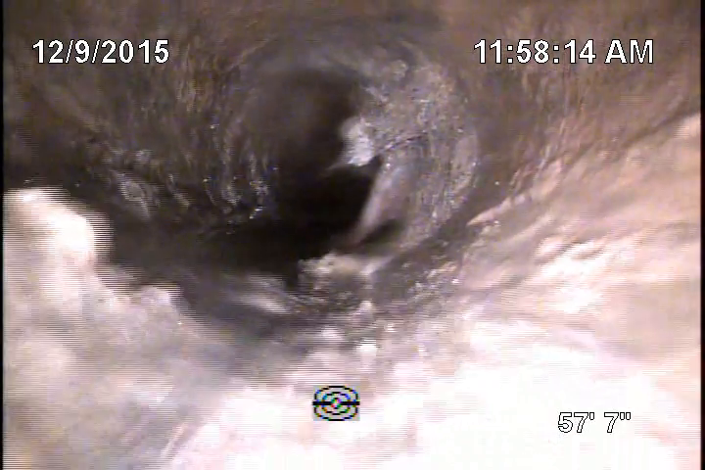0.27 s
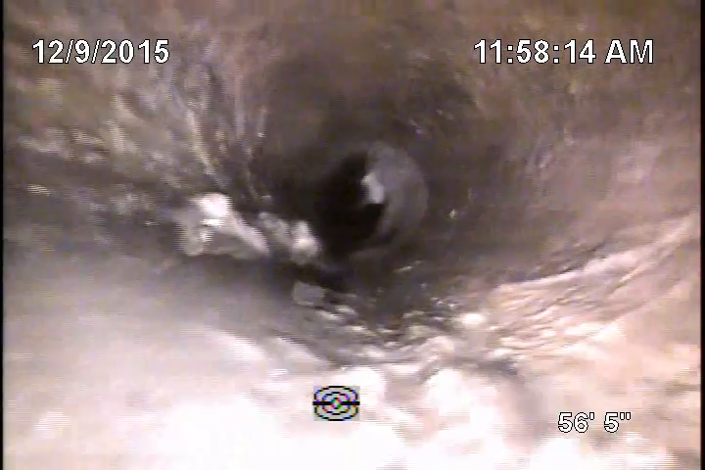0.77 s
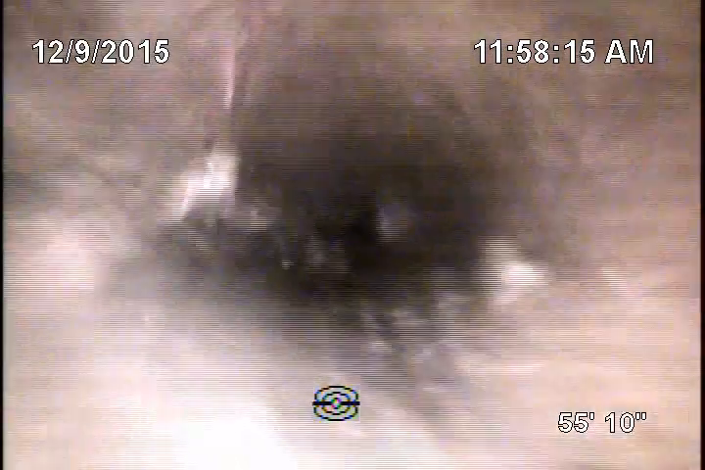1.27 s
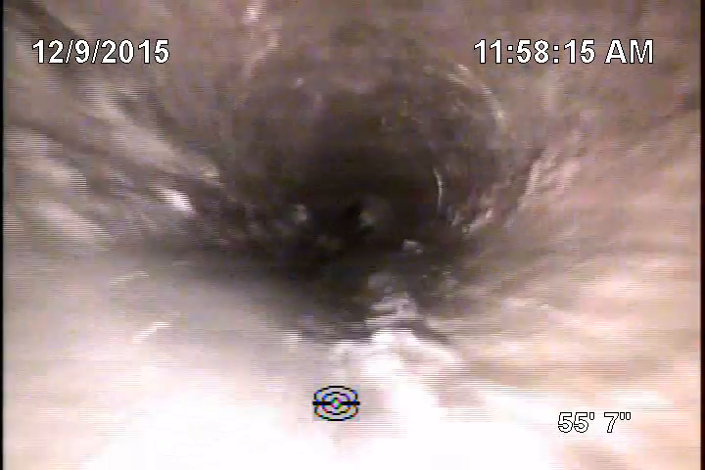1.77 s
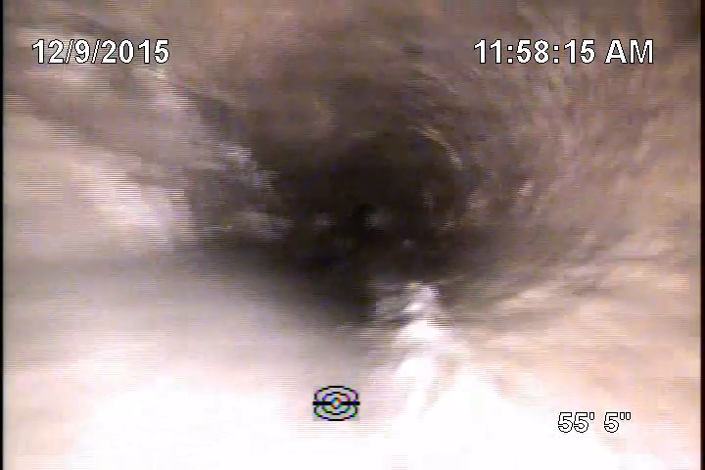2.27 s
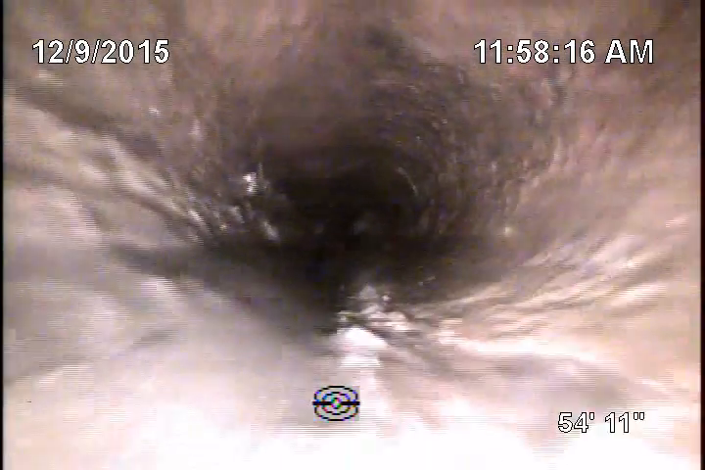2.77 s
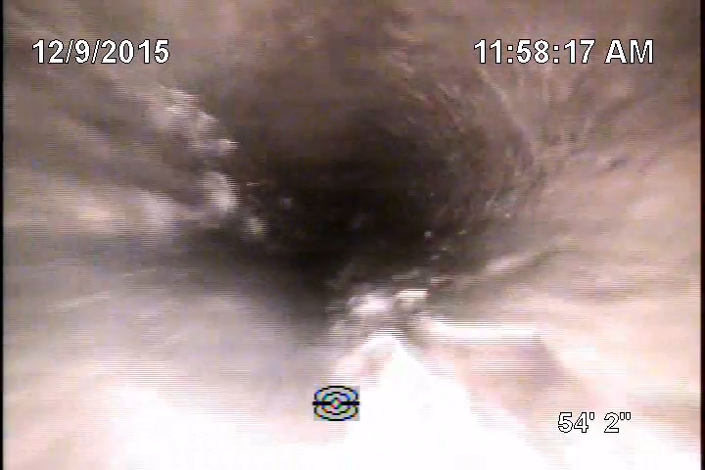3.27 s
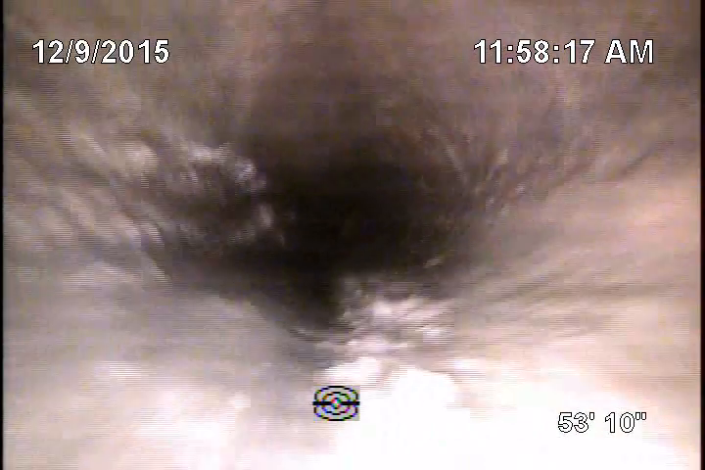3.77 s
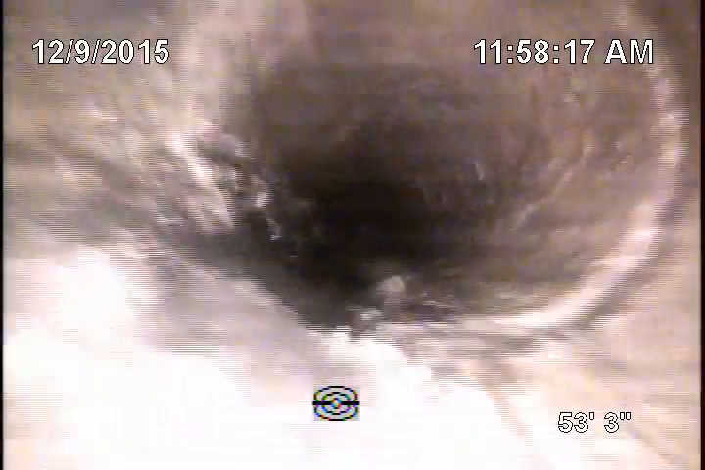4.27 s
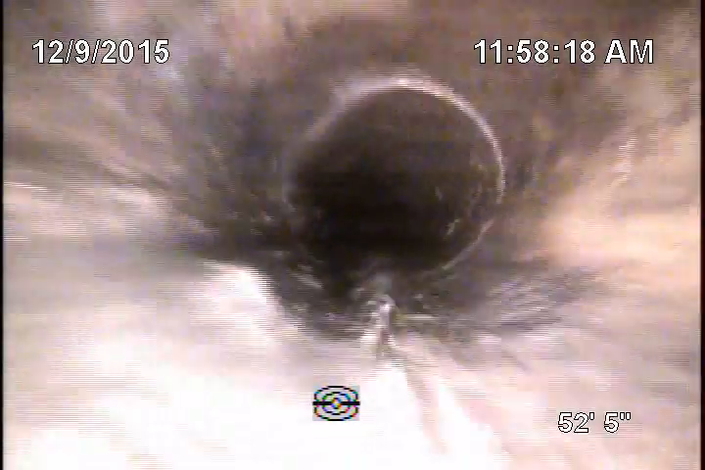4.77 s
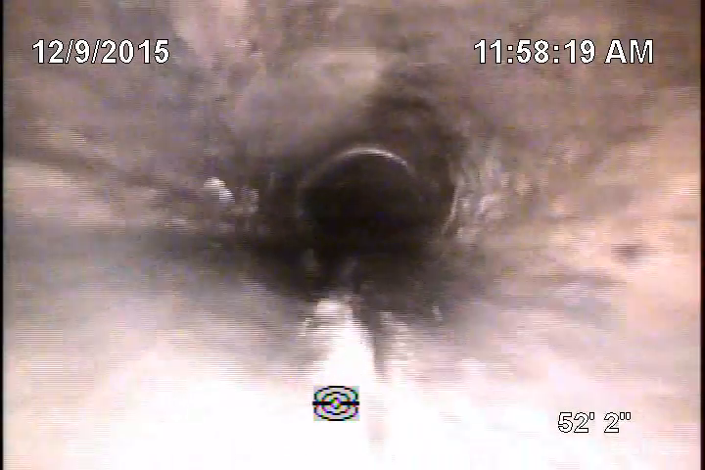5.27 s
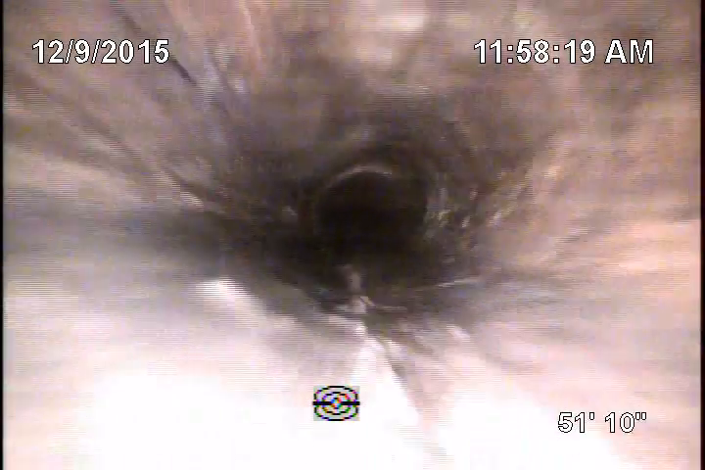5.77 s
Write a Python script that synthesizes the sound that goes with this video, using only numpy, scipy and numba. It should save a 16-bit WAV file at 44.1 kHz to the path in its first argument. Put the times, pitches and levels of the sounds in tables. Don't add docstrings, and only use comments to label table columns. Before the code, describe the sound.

A stiff push cable is pulled back by hand into its reel outdoors, very close to a small built-in microphone. It opens with a tight cluster of hard clacks, then sparse ticks, scrapes and separate rattling strokes. A sharp double knock with a brief high steel ping comes past the middle, and the heaviest, distorted slam lands near five seconds before light clicks and brushes. Faint hiss and a thin whine stay underneath.

```python
import sys
import numpy as np
from scipy import signal
from scipy.fft import rfft, irfft
from scipy.io import wavfile
from numba import njit

SR = 44100
rng = np.random.default_rng(int(sys.argv[2]) if len(sys.argv) > 2 else 0)


def file_out(sig):
    cols = np.atleast_2d(sig).T
    lim = np.clip(cols, -1, 1)
    pcm = np.round(lim * 32767).astype(np.int16)
    wavfile.write(sys.argv[1], SR, pcm)


def ratio_of_db(decibels):
    return 10 ** (np.asarray(decibels, float) / 20)


N = 264600

# f/Hz, width/Hz, level/dB
HOUSING_MODES = [(221.4, 24.8, -3), (453, 49, -3.5), (287, 110, -11.5)]


def rms_one(x):
    return x / np.sqrt(np.mean(x ** 2) + 1e-20)


def drift(rate_hz):
    r = np.exp(-2 * np.pi * rate_hz / SR)
    return rms_one(signal.lfilter([1], [1, -2 * r, r * r], rng.standard_normal(N + SR))[SR:])


def resonate(x, hz, width_hz):
    r = np.exp(-np.pi * width_hz / SR)
    zeros = np.array([1, 0, -1]) * (1 - r * r) / 2
    return signal.lfilter(zeros, [1, -2 * r * np.cos(2 * np.pi * hz / SR), r * r], x)


def cut(x, hz, kind):
    return signal.sosfilt(signal.butter(2, min(hz, .45 * SR), kind, fs=SR, output="sos"), x)


def ring_housing(x):
    return sum(ratio_of_db(db) * resonate(x, hz, width_hz) for hz, width_hz, db in HOUSING_MODES)


def grains(per_s, spread_db):
    sizes = ratio_of_db(spread_db * np.minimum(rng.exponential(1, N), 4)) * rng.choice([-1, 1], N)
    hit = rng.random(N) < per_s * ratio_of_db(1.5 * drift(40)) / SR
    return sizes * hit + 1e-18


def rattle(modes, per_s, spread_db, patchy_db):
    out = 0
    for hz, width_hz, level_db in modes:
        ring = rms_one(resonate(grains(per_s, spread_db), hz, width_hz))
        out = out + ratio_of_db(level_db + patchy_db * drift(19)) * ring
    return rms_one(out)


@njit
def sweep(x, cosines, r):
    out = np.zeros(len(x))
    for i in range(2, len(x)):
        out[i] = x[i] - x[i - 2] + 2 * r * cosines[i] * out[i - 1] - r * r * out[i - 2]
    return out


def contact(centre_hz, width_hz, per_s):
    cosines = np.cos(2 * np.pi * centre_hz / SR)
    return rms_one(sweep(grains(per_s, 1.4), cosines, np.exp(-np.pi * width_hz / SR)))


def floor():
    # f/Hz, level/dB
    spectrum = [(26, -44), (45, -11), (126, -5), (220, 4.5), (377, -9), (448, -5), (3090, -2), (7270, -5),
                (7820, -8.5), (15500, -7.5)]
    floor_db, whine_db, whine_hz = -49.5, -59, 8000
    hz, level_db = np.transpose(spectrum)
    bins_hz = np.maximum(np.fft.rfftfreq(N, 1 / SR), 1)
    gain = ratio_of_db(np.interp(np.log(bins_hz), np.log(hz), level_db))
    noise = irfft(rfft(rng.standard_normal(N)) * gain, N)
    whine = np.sqrt(2) * ratio_of_db(whine_db) * np.sin(2 * np.pi * whine_hz * np.arange(N) / SR)
    return ratio_of_db(floor_db) * rms_one(noise) + whine


def yard(x):
    t = np.arange(SR // 4) / SR
    decay = ratio_of_db(-60 * t / 0.14) * np.minimum(t / 0.0016, 1)
    tail = cut(rng.standard_normal(len(t)) * decay, 1900, "low")
    return ratio_of_db(-17.5) * signal.fftconvolve(x, tail / np.sqrt(np.sum(tail ** 2)))[:N]


def bumps():
    # t/s, peak/dB
    push_events = [
        (1.345, -38),
        (3.049, -22),
        (5.636, -35.5),
        (5.841, -37),
    ]
    pushes = np.full(N, 1e-18)
    for s, peak_db in push_events:
        pushes[round(s * SR)] = ratio_of_db(peak_db + 44)
    return ring_housing(cut(pushes, 290, "low"))


def steel():
    # f/Hz, level/dB, t60/s
    steel_modes = [(7257, -13.5, .16), (7229, -22, .23)]
    hit_s, damped_s = 3.7105, 4.7
    t = np.maximum(np.arange(N) / SR - hit_s, 0)
    damped_db = -1500 * np.maximum(t - (damped_s - hit_s), 0)
    return sum(ratio_of_db(db - 60 * t / t60 + damped_db) * np.sin(2 * np.pi * hz * t) for hz, db, t60 in steel_modes)


def rubs():
    # start t/s, length/s, level/dB, from f/Hz, to f/Hz
    rub_events = [
        (1.24, .1, -50, 2300, 2100),
        (2.52, .05, -27, 1500, 1900),
        (2.642, .035, -38, 3800, 3500),
        (2.708, .075, -35, 4400, 4000),
        (2.842, .03, -40, 4200, 3400),
        (4.11, .04, -46, 2700, 2500),
        (5.14, .06, -33, 4500, 4100),
    ]
    edge_s, fade_db = .008, 5
    t = np.arange(N) / SR
    gain, hz = np.zeros(N), np.full(N, 3000.)
    for s, length_s, level_db, from_hz, to_hz in rub_events:
        along = (t - s) / length_s
        gate = np.clip(np.minimum(t - s, s + length_s - t) / edge_s + .5, 0, 1)
        gain += gate * ratio_of_db(level_db - fade_db * np.clip(along, 0, 1))
        hz = np.where(gate > 0, from_hz + (to_hz - from_hz) * along, hz)
    return gain * rms_one(cut(contact(hz, 380, per_s=5000), 900, "high"))


def contacts():
    # t/s, peak/dB, main ring f/Hz, relative thump/dB
    slaps = [(.016, 3, 1940, -26.5), (.043, -13, 1960, -40), (.052, 7.5, 1820, -37.5),
             (.087, -9.5, 710, -26), (0.127, -6, 1910, -42), (0.778, -6, 1160, -26), (.794, 7, 1820, -23),
             (0.872, -7.5, 1380, -42), (1.38, -18, 1510, -16), (1.876, -17, 1600, -21),
             (1.912, -6.5, 1760, -33), (1.9395, -6, 1700, -17), (2.546, -7, 1700, -30),
             (2.589, -4.5, 1820, -15.5), (2.798, -17.5, 2020, -4.5), (2.951, -4, 2350, -33),
             (3.069, -13.5, 1500, -38), (3.094, 3, 2100, -44), (3.116, -9, 860, -19),
             (3.342, -14, 770, -1.5), (3.686, -11, 2150, -33), (3.701, 7.5, 2360, -19),
             (3.71, 4, 1580, -13), (3.895, -11.5, 1060, -15), (4.529, 7, 1900, -10),
             (4.927, 14.5, 1910, -9), (4.935, 20.5, 2160, -25), (4.949, 2.5, 1830, -1),
             (4.972, 6, 2050, -28), (5.139, -6.5, 1900, -35)]
    # t/s, peak/dB, main ring f/Hz, relative snap/dB
    ticks = [(.121, -13, 770, -20), (.361, -27, 2800, -8.5), (.441, -22, 1290, -24),
             (.619, -20, 3180, -13.5), (.758, -18, 865, -26), (2.052, -9, 1150, -48),
             (2.063, -5, 1100, -34), (2.109, -16, 1000, -17.5), (2.203, -19.5, 810, -18.5),
             (2.367, -27.5, 2630, -17), (2.714, -19, 4120, -17), (2.741, -10.5, 3740, -14),
             (2.772, -13.5, 4430, -13), (2.939, -10, 1770, -23), (2.969, -15, 760, -7),
             (3.184, -29.5, 960, -5), (3.322, -23, 970, -9), (4.371, -23, 2240, -32),
             (4.382, -16.5, 2070, -21), (4.472, -34, 1760, -17), (4.546, -17, 1270, -27),
             (4.628, -15.5, 3000, -25), (4.862, -17, 2100, -18), (5.142, -8, 3700, -26),
             (5.213, -19, 2150, -12.5), (5.386, -30, 1710, -2.5), (5.464, -19, 4180, -14),
             (5.653, -24.5, 3430, -11), (5.703, -21.5, 4400, -6), (5.832, -30, 3340, -14)]
    # t/s, peak/dB, main ring
    # f/Hz
    flicks = [(.487, -34.5, 1500), (1.625, -37, 1290), (3.012, -25, 2510), (4.055, -27, 1750),
              (4.106, -26, 2700), (4.833, -30, 2350), (4.531, -2.5, 800), (3.096, -6.5, 625),
              (5.747, -35, 3000), (5.902, -39, 2800), (5.929, -34.5, 1900), (5.968, -36, 2400),
              (5.988, -31, 3800)]
    slap_snap_db, flick_snap_db = -26.5, -12
    tick_thump_db, thump_db_per_octave = -18, -1
    knock_list = [(s, db, hz, slap_snap_db, thump_db) for s, db, hz, thump_db in slaps]
    for s, db, hz, snap_db in list(ticks) + [(*row, flick_snap_db) for row in flicks]:
        thump_db = tick_thump_db + thump_db_per_octave * np.log2(hz / 1000)
        knock_list.append((s, db, hz, snap_db, thump_db))
    return knock_list


def knocks():
    out, length = np.zeros(N + SR), SR // 4
    t = np.arange(length) / SR
    t60_s, rise_s = 0.019, 0.00055
    shape = ratio_of_db(-60 * (t / t60_s) ** 0.99) * np.minimum(t / rise_s, 1)
    for s, peak_db, hz, snap_db, thump_db in contacts():
        noise = rng.uniform(-1.19, 1, SR // 20)
        burst = np.pad(noise, (0, length - len(noise))) * shape + 1e-18
        rings = resonate(burst, hz, 0.34 * hz) - ratio_of_db(-4) * resonate(burst, 1.64 * hz, 0.14 * hz)
        crack = cut(cut(burst, 680, "high"), min(3900, 2.3 * hz), "low")
        body = cut(rings, 2.08 * hz, "low") + ratio_of_db(-12) * crack
        snap = cut(burst * ratio_of_db(-300 * t), 3100, "high")
        thump = cut(ring_housing(burst), 155.7, "high")
        parts = [(body, -1.5), (snap, snap_db + 11.5), (thump, thump_db - 5.5)]
        at = round(s * SR)
        out[at:at + length] += sum(ratio_of_db(peak_db + db) * part / np.abs(part).max() for part, db in parts)
    return out[:N]


def strokes():
    # peak t/s, build-up/s, level/dB, relative grit/dB, relative weight/dB
    jerks = [(0.053, 0.2, -11, -25, -11), (0.133, 0.11, -24.5, -15, -6.5), (0.448, 0.12, -37.5, -1, -6.5),
             (0.793, 0.085, -18, -6.5, -16.5), (0.886, 0.08, -33.5, -8, -0.5),
             (1.526, 0.094, -33.5, -23, -6), (1.915, 0.071, -22, -7, -5.5), (2.054, 0.011, -29, -30, -9),
             (2.064, 0.015, -28, -26, -14), (2.215, 0.05, -48, -3, 5), (2.804, .015, -27.5, -10, -13.5),
             (2.949, 0.059, -21.5, -3.5, -10.5), (3.092, 0.0098, -21.5, -3, -6.5),
             (3.342, 0.025, -41.5, -5, 5), (3.672, 0.09, -29.5, -12, -9), (3.711, 0.061, -12.5, 1, -12.5),
             (3.76, 0.15, -39, -5, -16), (3.894, 0.0074, -33, 1, -16), (4.302, 0.21, -46.5, -2.5, -1),
             (4.533, .015, -16.5, -2, -19), (4.935, 0.05, -7, -5.5, -10.5), (4.975, 0.11, -10.5, -7, -15.5),
             (5.143, .01, -30, -6.5, -8.5), (5.843, .04, -55.5, 10, 1.5)]
    # offset/dB, quick fall/(dB/s), tail/dB, tail fall/(dB/s)
    after_jerk = [(-2, 307, -4.5, 99), (-1.5, 459.5, -4, 114.5), (-2, 705, -9.5, 128.5),
                  (-3, 905, -14, 135)]
    # start t/s, length/s, hiss/dB, relative grit/dB, relative rasp/dB
    slides = [(0.0, 0.056, -38.5, -2.5, 17), (0.113, 0.08, -39.5, -6.5, -16),
              (0.622, 0.021, -37.5, -2.5, -5.5), (.748, .03, -47.5, 10, 10), (1.056, 0.16, -47.5, -1, -1),
              (1.228, .1, -65.5, 4.5, 19), (1.377, 0.14, -39, 3, 8.5), (1.813, 0.18, -51.5, -0.5, 0.5),
              (2.407, 0.14, -52.5, 0.5, 7), (2.533, 0.048, -41, 4.5, 12), (2.588, 0.034, -28.5, 7, 7.5),
              (2.647, 0.028, -34, -3, -9), (2.715, .06, -32, -6, -14), (3.326, 0.02, -38, -6, -7.5),
              (4.001, 0.061, -40.5, -5, -4), (4.113, 0.036, -39.5, -6.5, -7), (4.42, .07, -50, 3, 5),
              (4.608, 0.068, -41, 2, 6), (4.726, 0.06, -44, -2, -2.5), (5.376, .05, -44.5, -1, -2.5),
              (5.461, 0.072, -38, -8, -10), (5.932, .045, -46, -5, -4), (5.984, .05, -36.5, -15, -17)]
    # start t/s, length/s, hiss/dB, relative grit/dB, relative rasp/dB
    brushes = [(0.217, 0.063, -49, -3, -8), (.655, .035, -57, 5, -2), (0.916, 0.094, -50, -1, 7),
               (1.576, 0.062, -49.5, 3.5, -2.5), (2.838, 0.039, -52, 12.5, 13), (2.99, 0.015, -45, 2, -6),
               (3.63, .04, -45, -4, -1.5), (4.485, .035, -42, 2, 1), (5.03, 0.057, -40.5, 6, 11),
               (5.143, 0.025, -49.5, 18, 3), (5.193, 0.048, -57.5, 17, 8), (5.268, 0.089, -53.5, -1, 10),
               (5.68, 0.1, -56.5, 2, -15), (5.897, .01, -56, 4, 1)]
    # stop t/s, swell/s, hiss/dB, relative grit/dB, relative rasp/dB
    catches = [
        (0.816, 0.12, -44, 3.5, 10.5),
        (2.117, .12, -48, -8, 14),
        (2.561, 0.099, -45.5, 4, 10),
        (3.82, 0.4, -51.5, 5, 15.5),
        (4.394, 0.061, -41.5, 9, 15.5),
        (5.992, 0.042, -35, -4, -10),
    ]
    build_up_db, tail_follows_weight = 36, 0.54
    rise_db_per_s, fall_db_per_s, slide_boom_db = 706, 605, -12
    stop_db_per_s, catch_boom_db = 2500, -8

    t = np.arange(0, N + 32, 32) / SR
    driven, ringing = np.full((4, len(t)), 1e-5), np.zeros((4, len(t)))
    for s, build_s, level_db, grit_db, weight_db in jerks:
        part_db = [weight_db, 0, grit_db, grit_db]
        for k, (offset_db, quick, tail_db, slow) in enumerate(after_jerk):
            top_db = level_db + offset_db + part_db[k]
            driven[k] += ratio_of_db(top_db - np.where(t < s, build_up_db * (s - t) / build_s, quick * (t - s)))
            tail_top_db = top_db + tail_db + (k > 0) * tail_follows_weight * weight_db
            ringing[k] += ratio_of_db(tail_top_db - slow * np.abs(t - s)) * (t > s)
    for s, length_s, hiss_db, grit_db, rasp_db in list(slides) + list(brushes):
        rise_db = rise_db_per_s * np.maximum(s - t, 0)
        fall_db = fall_db_per_s * np.maximum(t - s - length_s, 0)
        part_db = np.array([[rasp_db + slide_boom_db], [rasp_db], [grit_db], [0]])
        driven += ratio_of_db(hiss_db - (rise_db + fall_db) + part_db)
    for s, swell_s, hiss_db, grit_db, rasp_db in catches:
        edge_db = np.where(t < s, build_up_db * (s - t) / swell_s, stop_db_per_s * (t - s))
        part_db = np.array([[rasp_db + catch_boom_db], [rasp_db], [grit_db], [0]])
        driven += ratio_of_db(hiss_db - edge_db + part_db)
    taut = driven[1] / (driven[1] + ringing[1])
    return [np.interp(np.arange(N) / SR, t, row) for row in [*(driven + ringing), taut]]


def drag():
    # f/Hz, width/Hz, level/dB
    cage_modes = [(791, 197, 2), (1220, 330, -5), (1640, 790, -11), (2070, 240, -3), (2350, 63, -7.5)]
    # f/Hz, width/Hz, level/dB
    grit_modes = [(3020, 440, 5.5), (3900, 2100, -4), (4950, 490, -5)]
    taut_hz, slack_hz = 1900, 1000
    grit_loud_hz, grit_soft_hz, grit_turn_db = 2960, 4200, 1.2
    taut_cage_db, bright_grit_db = -4.5, 2.5

    boom_gain, rasp_gain, grit_gain, hiss_gain, taut = strokes()
    rasp_hz = slack_hz + (taut_hz - slack_hz) * taut
    bright = grit_gain ** 2 / (grit_gain ** 2 + (ratio_of_db(grit_turn_db) * rasp_gain) ** 2)
    grit_hz = grit_loud_hz + (grit_soft_hz - grit_loud_hz) * bright

    boom = cut(rattle(HOUSING_MODES, per_s=900, spread_db=1.5, patchy_db=3.5), 140, "high")
    rasp = ratio_of_db(taut_cage_db * taut) * rattle(cage_modes, per_s=1500, spread_db=3.5, patchy_db=1.2)
    rasp = rasp + ratio_of_db(0.5) * contact(rasp_hz, 890, per_s=2600)
    rasp = cut(cut(rasp, 487, "high"), 2820, "low")
    grit = rattle(grit_modes, per_s=3000, spread_db=3.5, patchy_db=5.5)
    grit = grit + ratio_of_db(1.5 + bright_grit_db * bright) * contact(grit_hz, 1100, per_s=3600)
    grit = cut(cut(grit, 1700, "high"), 6900, "low")
    hiss = rms_one(cut(grains(per_s=17000, spread_db=4.0), 6800, "high"))

    moving = rasp_gain * rms_one(rasp) + grit_gain * rms_one(grit) + hiss_gain * hiss
    return boom_gain * boom + moving * ratio_of_db(1.52 * drift(79))


def scene():
    blows = knocks()
    return (floor() + yard(blows) + bumps() + steel() + rubs() + blows + drag())[None]


def band_limit(x):
    return signal.sosfilt(signal.butter(12, 16500, fs=SR, output="sos"), x)


def record(dry):
    overload = .76
    square = np.minimum(np.abs(dry), 1) ** 0.94
    puffs = cut(cut(square, 81, "low"), 17, "high")
    loaded = dry + ratio_of_db(-25.5) * puffs
    clipped = loaded / (1 + np.abs(loaded / overload) ** 6) ** (1 / 6)
    top_cut = signal.firwin(401, 15800, fs=SR)
    mix = signal.fftconvolve(clipped, top_cut[None], "same")
    return band_limit(mix)


dry = scene()
out = record(dry)
file_out(out)
```